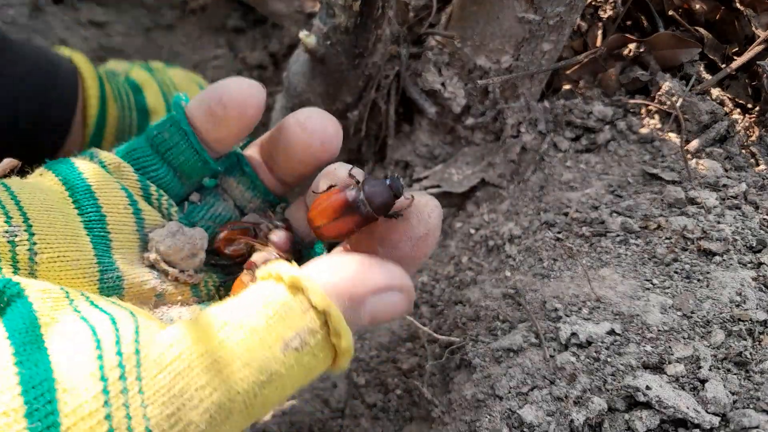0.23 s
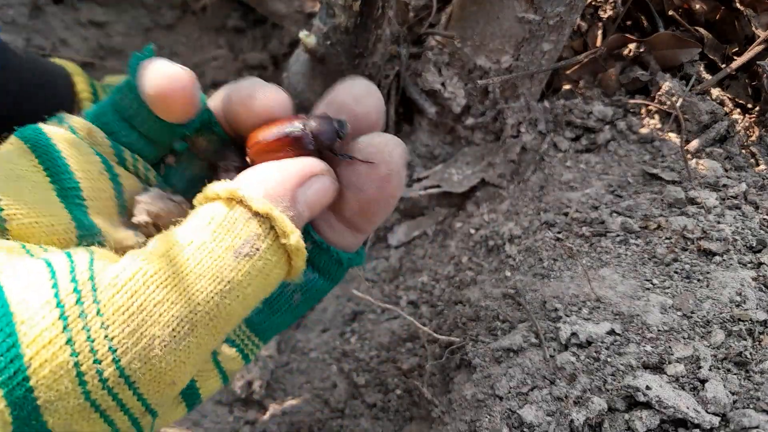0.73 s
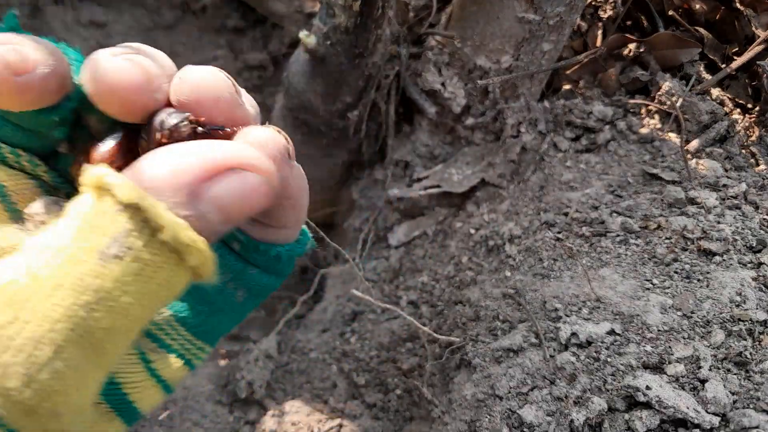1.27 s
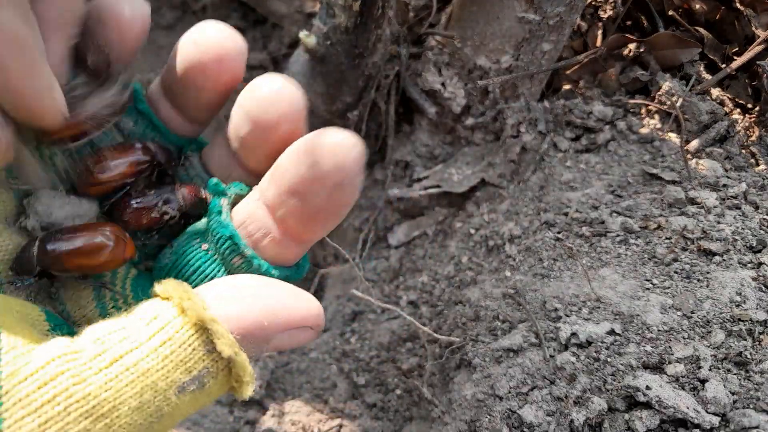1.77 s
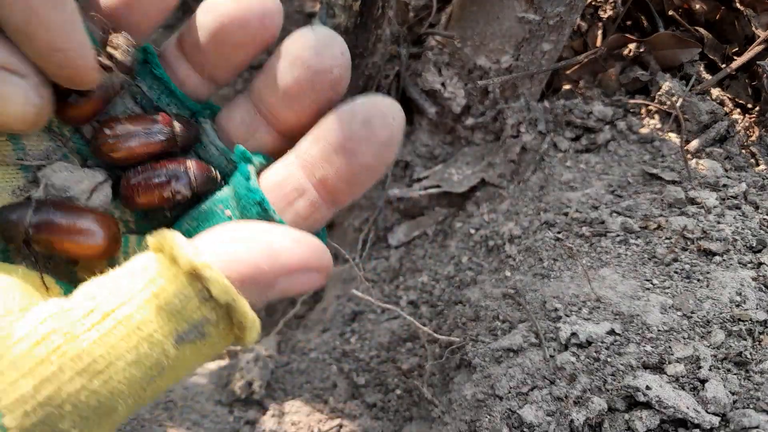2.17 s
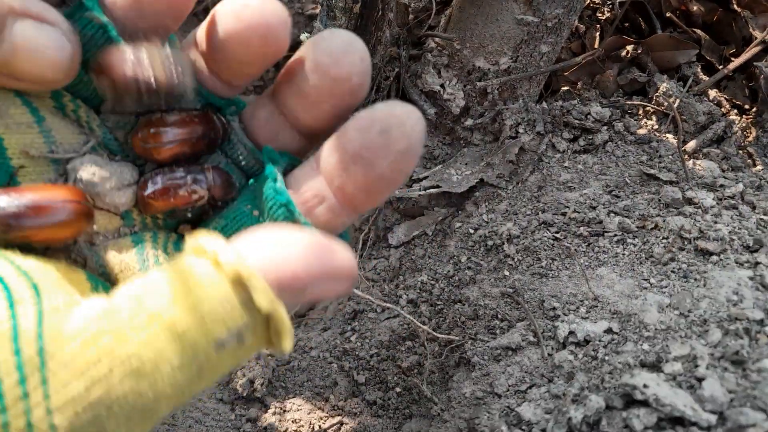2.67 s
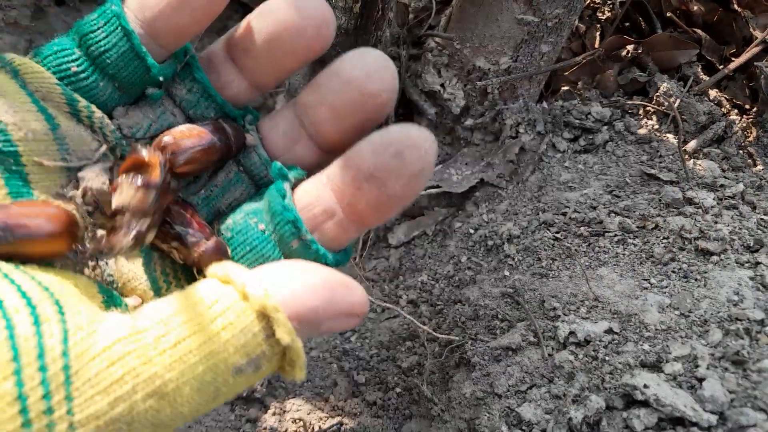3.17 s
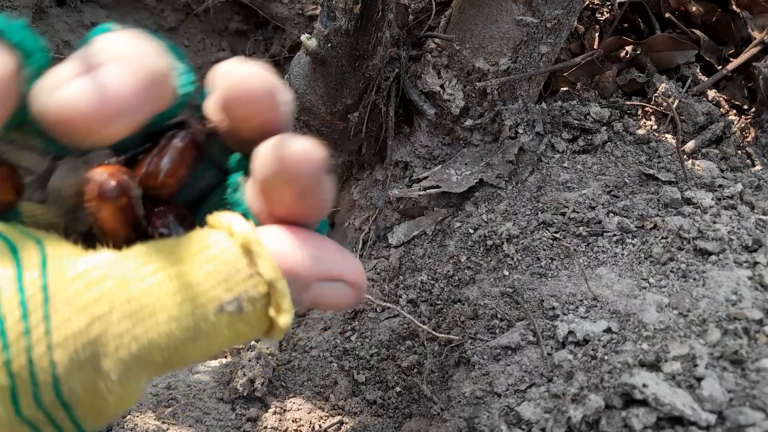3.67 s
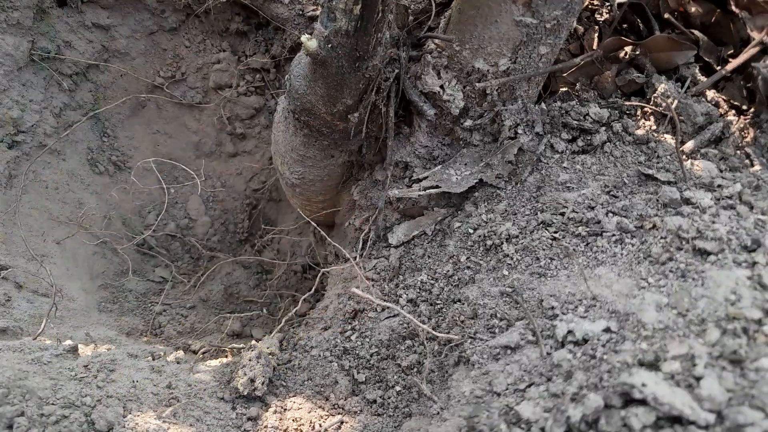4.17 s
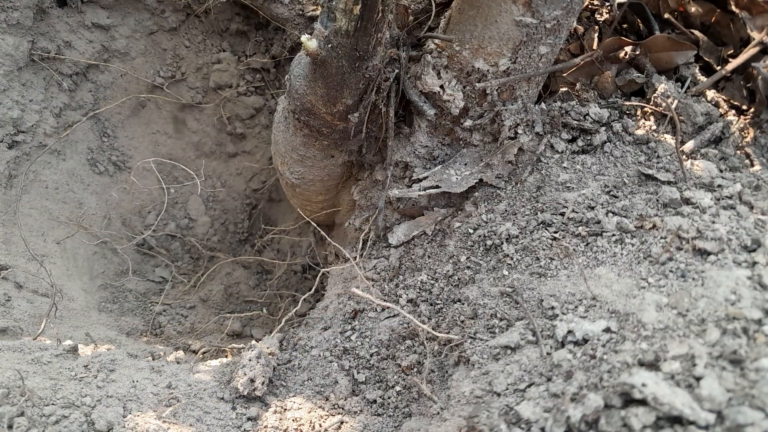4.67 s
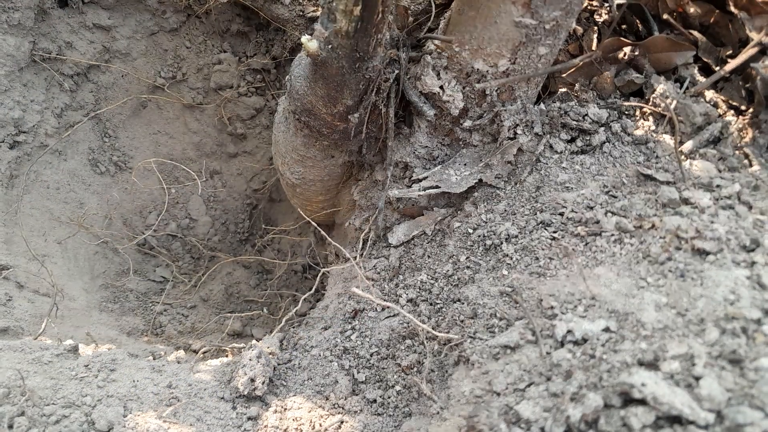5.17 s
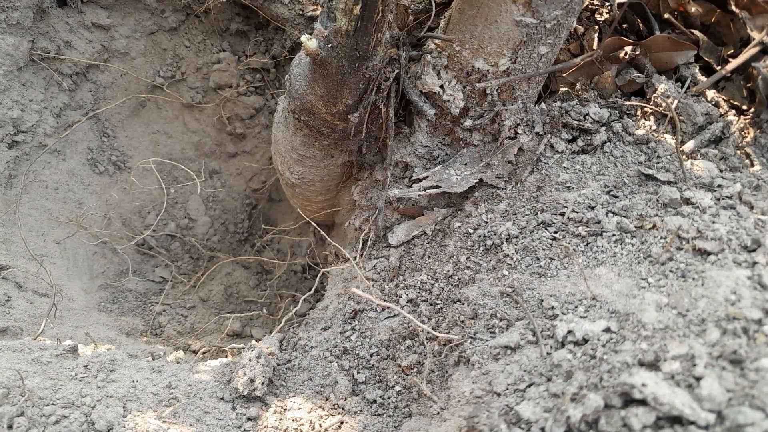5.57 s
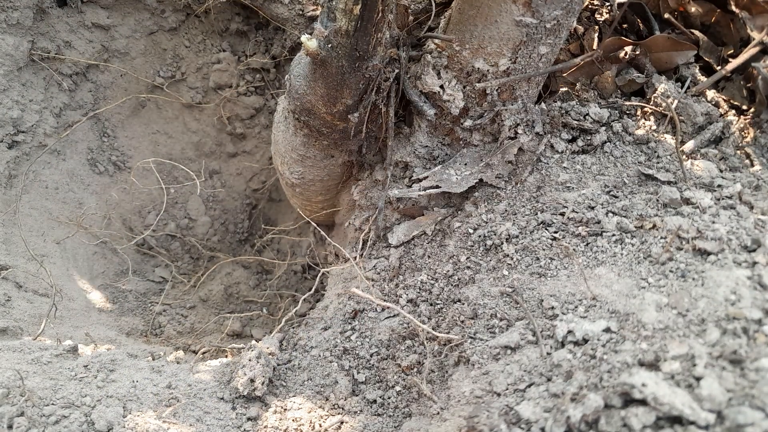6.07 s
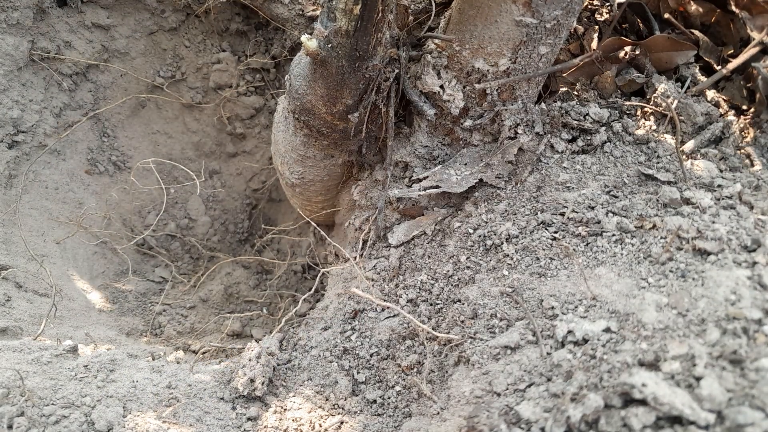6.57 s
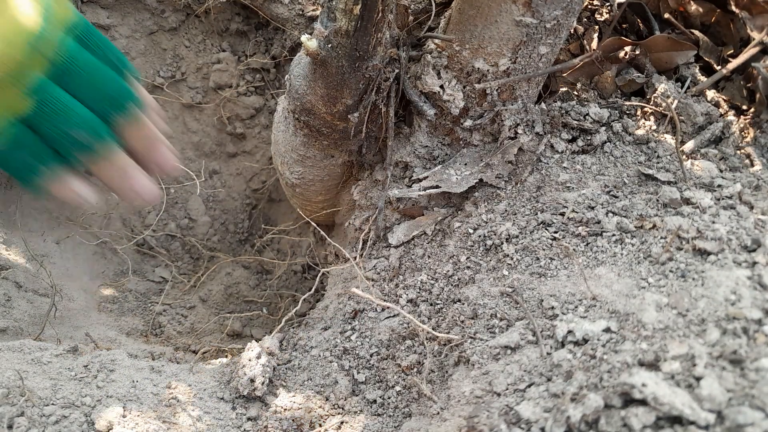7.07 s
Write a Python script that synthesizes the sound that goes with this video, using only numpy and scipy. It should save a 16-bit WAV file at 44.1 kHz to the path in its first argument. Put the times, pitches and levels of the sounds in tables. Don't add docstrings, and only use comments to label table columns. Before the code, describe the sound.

Light wind and faint hiss with tiny dry ticks, then close bursts of crumbly soil cracking, scraping and crunching under gloved hands and a blade.

```python
import sys
import numpy as np
from scipy import signal
from scipy.fft import rfft, irfft, next_fast_len
from scipy.io import wavfile
from scipy.ndimage import uniform_filter1d

SR = 44100
rng = np.random.default_rng(int(sys.argv[2]) if len(sys.argv) > 2 else 0)


def master_out(mix):
    frames = np.transpose(np.atleast_2d(mix))
    ceiling = np.clip(frames, -1, 1)
    pcm = np.round(ceiling * 32767).astype(np.int16)
    wavfile.write(sys.argv[1], SR, pcm)


def makeup_ratio(level_db):
    decades = np.asarray(level_db, float) / 20
    return 10 ** decades


N = 322371

# start_s, left_lead_samples, left_over_right_db
PLACES = [
    (0, 0, -2),
    (.75, 13, 2),
    (1.18, 21, 4.5),
    (1.78, 0, 0),
    (2.78, 21, 6.5),
    (4.1, 17, 9),
    (4.6, 18, 1),
    (5.78, -4, -2.5),
    (6.58, 14, 1),
    (7.06, 18, 7),
]
NEAR_DB = 2.5

# top_s, rise_s, fall_s, strength_db, heaviness_db
GLOVE_RUBS = [(.85, .1, .3, -73, -2), (1.13, .4, .1, -73, -7), (1.35, .25, .15, -61.5, -9),
              (1.58, .08, .15, -76, -14), (2.34, .02, .04, -75, -16), (2.48, .08, .1, -76, -10),
              (1.45, .05, .06, -67, -5), (1.68, .15, .45, -71, -5), (1.7, .05, .1, -84, 14),
              (2.21, .06, .15, -70, -8), (6.68, .25, .08, -65, -6), (6.78, .055, .15, -60, -10),
              (6.92, .15, .15, -59, -11), (7.035, .15, .04, -56, -3), (7.15, .15, .25, -55, -10),
              (7.3, .1, .2, -71, 8)]
# top_s, rise_s, fall_s, strength_db, heaviness_db
LEFT_BLADE_RUBS = [(3.73, .15, .08, -75, -4), (3.81, .04, .07, -65, -2), (3.92, .15, .2, -62, -4),
                   (3.99, .12, .1, -58, -14), (4.05, .1, .1, -64, -9), (4.086, .05, .3, -53, -7),
                   (4.21, .2, .2, -60, -3), (4.32, .05, .075, -42, -9), (4.5, .12, .15, -61, 2),
                   (4.66, .35, .55, -69, -14), (4.87, .015, .15, -56, 0), (5.05, .2, .6, -76, -12),
                   (5.662, .012, .07, -61, 6)]
# top_s, rise_s, fall_s, strength_db, heaviness_db
BLADE_RUBS = [
    (5.825, .07, .15, -62, -7),
    (5.94, .2, .07, -61, -1),
    (6.04, .1, .15, -58, -1),
    (6.16, .14, .15, -50, 1),
    (6.21, .08, .18, -47, 0),
    (6.3, .05, .13, -44, -5),
    (6.37, .08, .15, -50, 0),
    (6.52, .25, .04, -55, -5),
]
# start_s, rise_s, fall_s, strength_db, heaviness_db
SLIDE = (3.31, .09, .09, -52, -11)
SLIDE_HOLD_S = .23
SWELL_DB = 20
GLOVE_DUST_DB, GLOVE_THUD_DB = 1, -5
LEFT_BLADE_DUST_DB, LEFT_BLADE_THUD_DB = -2, -5
BLADE_DUST_DB, BLADE_THUD_DB = -6, -6
SLIDE_DUST_DB, SLIDE_THUD_DB = -.5, 5
DUST_PER_HEAVINESS = -.3
# dust_db, fizz_db, body_db, thud_db
TRICKLE_DB = (-82, -90, -95, -88)

# start_s, strength_db, heaviness_db, depth_db, t60_s
KNOCKS = [(3.2866, -21, -12, -5, .025), (3.3395, -37, -14, 11, .044), (3.61, -37, -29, 16, .01),
          (3.785, -37, -6, -4, .02), (3.9344, -34, -3.5, -18, .012), (4.0772, -39, -9, -3, .013),
          (4.0882, -26, -16, -25, .015), (4.1024, -48, 6, -12, .015), (4.114, -42, -13, -5, .02),
          (4.2241, -40, -10, 5, .061), (4.2866, -29, -6, -16, .051), (4.314, -34, -5.5, 5, .088),
          (4.3258, -27.5, -7.5, -2.5, .046), (4.4641, -45.5, 0, 3, .03), (4.4724, -56, 17, -3, .013),
          (5.646, -26, 0, 6.5, .03), (5.6823, -25, 0, -5.5, .016), (6.7634, -42, -18, -18, .059),
          (7.2798, -39.5, -11, -9, .03), (7.2851, -46, -10, 3, .015)]
# start_s, strength_db, heaviness_db, depth_db, t60_s
CHOPS = [
    (6.0147, -53, 9, -1, .042),
    (6.1155, -45, 0, -19, .088),
    (6.1342, -39, -6, -4, .088),
    (6.2078, -25.5, 11, -13, .03),
    (6.281, -34, 8.5, -21, .03),
    (6.2862, -26.5, -5, 2, .043),
    (6.3006, -34, 10, -29, .025),
    (6.307, -29, 4, -3, .04),
    (6.3671, -28.5, 6, -30, .009),
    (6.3945, -43, -3, -13, .026),
]
# start_s, strength_db, heaviness_db, left_over_right_db
CRUMB_TICKS = [(1.1028, -54, -16, 0), (0.733, -50, -30, 2), (1.1548, -49, -16, -3), (1.1815, -44, -24, 0),
               (1.2057, -53, -22, -3), (1.239, -48, -27, 4), (1.2951, -51.5, -25, 18),
               (1.317, -48, -13, 14), (1.36, -53, -3, 5), (1.4334, -46, -20, 9), (1.4519, -41, -31, 7),
               (1.46, -44, -18, 5), (1.4775, -34, -37, 9), (1.4827, -34, -30, 7), (1.4907, -43, -26, 7),
               (1.6824, -48, -8, 7.5), (1.9244, -61, -2, 17), (1.94, -54, -6, -5), (2.182, -52.5, -27, -5),
               (2.2274, -42, -13, 0), (2.2795, -53.5, -20, 14), (2.74, -60, -8, -7), (2.8405, -55, -10, 13),
               (3.2684, -34, -28, 8), (5.0898, -46, -14, 7), (5.4152, -58.5, -3, 14), (6.4757, -51, 1, 4),
               (6.8, -49, -7, 1), (7.2195, -28, -26, 6), (7.257, -41, -30, -2)]
TICK_T60_S, TICK_THUD_DB = .015, -5
# top_s, strength_db, heaviness_db, half_length_ms
CRUNCHES = [(0.875, -71, 4, 12), (1.356, -45.5, -35, 4.1), (1.8, -59.5, -17, 11), (2.03, -68.5, -21, 13),
            (2.509, -64.5, -10, 30), (2.885, -64, -4.5, 16), (3.246, -44.5, -18, 4.3),
            (3.276, -50.5, -18, 22), (3.285, -30.5, -11, 4.8), (3.551, -40.5, -15, 7.9),
            (3.598, -29, -12, 2.75), (3.792, -33, -9, 2.5), (3.883, -45.5, -3, 4), (4.164, -48.5, -8, 12.4),
            (4.179, -50, -1.5, 9.5), (4.295, -27.5, -9.5, 2.5), (4.511, -48.5, -8, 2.5),
            (4.905, -45.5, -9, 26), (5.73, -60, 2, 25), (6.322, -51, -4, 35), (6.378, -55, 10, 10.2),
            (6.382, -44, -3, 2.8), (6.792, -44, -10, 2.4), (6.814, -50.5, -8.5, 15), (7.18, -28, -24, 4.5),
            (7.212, -41, -11, 3.8),
            (.083, -65, -30, 1), (.315, -61, -25, 1), (.8215, -57, -14, 1), (1.041, -53, -16, 1),
         (1.083, -63, -2, 2), (1.112, -57, -18, 1), (1.168, -55, -20, 1.2), (1.248, -55, -12, 9),
         (1.3535, -42, -22, .9), (1.361, -43, -25, .8), (1.784, -54, -22, 1.2), (2.345, -51, -30, 1),
         (2.8, -55, -22, 1.2), (3.177, -57, -22, 1.2), (3.4185, -41, -14, 1.2), (3.832, -49, -16, 1.5),
         (3.921, -46, -8, 4), (4.001, -46, -16, 2), (4.038, -45, -16, 1.5), (4.05, -48, -16, .8),
         (4.06, -45, -12, 2.5), (4.083, -40, -14, 4), (4.0895, -24, -18, .5), (4.151, -44, -8, 2),
         (4.27, -46, -12, 1.5), (4.2875, -26, -12, .6), (4.328, -23, -16, .5), (4.447, -54, 3, 1.5),
         (4.493, -54, 4, 1.5), (4.524, -49, -2, 2.5), (4.545, -54, 0, 2), (5.656, -48, 10, 2),
         (5.7, -54, 6, 2), (6, -59, 4, 3), (6.043, -51, 0, 3), (6.204, -40, 6, 3), (6.2095, -26, -5, 1.5),
         (6.301, -27, 6, .5), (6.322, -36, -10, 1.5), (6.344, -44, 0, 1.5), (6.352, -42, 0, 1),
         (6.455, -47, 0, 1.5), (6.499, -47, -6, 1.5), (7.126, -39, -22, 1), (2.33, -56, -30, .8),
         (2.695, -59, -25, 1.5), (4.78, -60, -6, 1.5), (6.741, -55, -12, 1.5), (6.828, -50, -15, 1.5),
         (7.073, -48, -20, 1.5)]
CRUNCH_THUD_DB = 0
# top_s, half_length_ms, pitch_hz, level_db
SLIPS = [(6.765, 4.6, 12800, -52), (6.805, 5, 13000, -50), (6.948, 7.2, 12300, -49), (6.962, 6, 14100, -50),
         (6.991, 5, 13000, -45), (7.005, 6, 11500, -49.5), (7.02, 7, 11600, -49),
         (7.036, 7.5, 12100, -48.5), (7.092, 11, 7700, -56), (7.126, 4, 12300, -45.5),
         (7.144, 17, 7600, -52.5), (3.995, 18, 3600, -60), (7.186, 7.7, 3020, -45), (1.16, 23, 660, -72),
         (1.36, 15, 950, -70), (3.35, 22, 720, -60), (3.43, 20, 3800, -58), (3.52, 20, 5500, -55),
         (3.545, 22, 3650, -53), (3.5, 24, 380, -60), (3.8, 10, 720, -58), (4.175, 12, 3500, -54),
         (4.52, 22, 175, -60), (5.8, 20, 300, -68), (6.88, 24, 1700, -70)]

# frequency_hz, density_db
FIZZ = [(2200, -66), (3200, -6.5), (4200, -6), (6000, -6.5), (8000, -4), (12000, -4.5), (15000, -7.5),
        (16500, -30)]
# frequency_hz, density_db
DUST = [(6500, -20), (8500, 1.5), (11500, 1), (14500, -2), (16500, -4)]
# frequency_hz, density_db
SAND = [(2200, -14), (3400, -6.5), (4300, -2.5), (7500, -4.5), (9500, -23)]
# frequency_hz, density_db
CLOD_BODY = [(450, -26), (800, -2.5), (1400, -2.5), (2200, -2), (3200, -6), (4300, -27)]
# pitch_hz, width_hz, level_db
BLADE = [(1080, 200, -11), (1830, 230, 1.5), (2240, 230, -4), (3080, 300, -1), (4100, 450, -6),
         (5000, 450, -9)]
# pitch_hz, width_hz, level_db
PIT = [(240, 80, -.5), (400, 120, 0.5), (690, 240, -5.5)]

# top_s, level_db, half_length_s
GUSTS = [(.13, -65, .1), (.54, -64, .1), (.95, -66, .3), (1.45, -67, .2), (1.9, -63, .22), (2.45, -69, .15),
         (2.86, -66, .1), (3.29, -57, .07), (3.52, -62, .08), (3.75, -60, .1), (4.05, -66, .15),
         (4.33, -60, .08), (4.63, -59, .1), (4.9, -66, .15), (5.35, -64, .1), (5.7, -61, .1), (6, -63, .1),
         (6.3, -56, .1), (6.47, -61, .1), (6.8, -61, .07), (7.16, -59, .08)]
CALM_DB = -71.5
# frequency_hz, density_db
RUMBLE = [(13, -53), (22, -35), (40, -12), (64, 4), (123, -4.5), (162, -9.5), (195, -15.5), (361, -40.5),
          (500, -36.5), (650, -62), (1100, -120)]
# frequency_hz, density_db
HISS = [(88, -30.5), (150, 3), (696, -13), (1360, -18.5), (1970, -16), (3350, -24.5), (4000, -19.5),
        (11400, -17), (15300, -19.5), (16500, -30.5)]
HISS_DB = -78
EDGE_HZ, SHELF_HZ = 15950, 16750


def scrape():
    t = np.arange(N) / SR
    dusty, fizzy, full, deep = effort(t)
    steady = np.interp(t, [3.28, 3.31, 3.56, 3.6], [0, .8, .8, 0])

    large = grit(per_s=100, spread_db=1.0, smooth=3.1, fade=.995) * makeup_ratio(2.1 * lumps(0.038))
    large = steady * large.mean() + (1 - steady) * large
    dust, sand, clods = rng.standard_normal((3, 2, N)) * large
    fine = [grit(per_s=500, spread_db=2.7, smooth=.9, fade=.95),
            grit(per_s=350, spread_db=2.6, smooth=1.5, fade=.96)]
    dust_grains, sand_grains = [steady * g.mean() + (1 - steady) * g for g in fine]

    dust = coloured(dust * dust_grains, DUST)
    sand = coloured(sand * sand_grains, SAND)
    metal = np.where(lead_of(t) < -1, .92, .1)
    ring = evened(ringing(clods, BLADE))
    dull = coloured(clods * sand_grains ** .5, CLOD_BODY)
    body = metal * ring + np.sqrt(1 - metal ** 2) * dull
    thud = evened(ringing(clods, PIT))
    layers = dusty * dust + fizzy * sand, full * body, deep * thud
    return .95 * ports(layers, lead_of(t), uniform_filter1d(side_of(t), size=4000))


def effort(t):
    coarse = t[::64]
    power = rubbing(coarse, GLOVE_RUBS, GLOVE_DUST_DB, GLOVE_THUD_DB)
    power = power + rubbing(coarse, LEFT_BLADE_RUBS, LEFT_BLADE_DUST_DB, LEFT_BLADE_THUD_DB)
    power = power + rubbing(coarse, BLADE_RUBS, BLADE_DUST_DB, BLADE_THUD_DB)
    power = power + rubbing(coarse, [SLIDE], SLIDE_DUST_DB, SLIDE_THUD_DB, SLIDE_HOLD_S)
    power = power + makeup_ratio(2 * np.array(TRICKLE_DB))[:, None]
    return [np.interp(t, coarse, np.sqrt(p)) for p in power]


def rubbing(t, rows, dust_db, thud_db, hold_s=0):
    power = 0
    for top, rise, fall, db, heavy_db in rows:
        away = np.maximum((top - t) / rise, (t - top - hold_s) / fall)
        swell = makeup_ratio(2 * (db - SWELL_DB * np.maximum(away, 0)))
        shares_db = np.array([dust_db + DUST_PER_HEAVINESS * heavy_db, 0, heavy_db, heavy_db + thud_db])
        power = power + makeup_ratio(2 * shares_db)[:, None] * swell
    return power


def grit(per_s, spread_db, smooth, fade):
    size = makeup_ratio(spread_db * np.minimum(rng.exponential(1, N), 4))
    hits = size * (rng.random(N) < per_s / SR)
    return smooth + evened(signal.lfilter([1], [1, -fade], hits))


def cracks():
    before = 1400
    out, t = np.zeros((2, N + 4000)), np.arange(-before, 2600) / SR
    after = np.maximum(t, 0)
    events = []  # (start or top s, strength dB, heaviness dB, thud against body dB, left-right dB, shape)
    sharp = [(s, db, heavy_db, TICK_THUD_DB, TICK_T60_S, pan_db) for s, db, heavy_db, pan_db in CRUMB_TICKS]
    sharp += [(*row, near_side(row[0])) for row in KNOCKS + CHOPS]
    for s, db, heavy_db, depth_db, t60, pan_db in sharp:
        decay = makeup_ratio(-60 * after / np.clip(t60, .006, .09))
        shape = (1 - np.exp(-after / 0.00017)) * decay
        events.append((s, db, heavy_db, depth_db, pan_db, shape))
    for s, db, heavy_db, half_ms in CRUNCHES:
        bell = makeup_ratio(-np.minimum(8 * abs(1000 * t / half_ms) ** 0.96, 200))
        events.append((s, db, heavy_db, CRUNCH_THUD_DB, near_side(s), bell))
    for s, db, heavy_db, depth_db, pan_db, shape in events:
        at = round(s * SR) - before
        body_db = db + heavy_db
        out[:, at:at + len(t)] += burst(s, shape, db, body_db, body_db + depth_db, pan_db)
    return out[:, :N]


def burst(s, shape, fizz_db, body_db, thud_db, pan_db):
    noise, rag = rng.standard_normal((2, 2, len(shape)))
    noise = noise * makeup_ratio(3.27 * evened(uniform_filter1d(rag[0], 20)))
    tilt_db = -.35 * np.clip(body_db - fizz_db + 12.5, -9, 14)
    own = [(hz, db + 2.9 * z + tilt_db * np.log2(hz / 5000)) for (hz, db), z in zip(FIZZ, rag[1])]
    fizz = coloured(noise, own) * shape ** 1.13

    ring = ringing(noise * shape, BLADE)
    ring = ring / np.linalg.norm(ring, axis=1, keepdims=True) * np.linalg.norm(shape)
    dull = coloured(noise, CLOD_BODY) * shape ** 0.81
    metal = .96 if lead_of(s) < 0 else .3
    body = metal * ring + np.sqrt(1 - metal ** 2) * dull

    thud = ringing(noise * shape ** .65, PIT)
    thud = thud / abs(thud).max(axis=1, keepdims=True)
    layers = makeup_ratio(fizz_db - 4) * fizz, makeup_ratio(body_db - 4) * body, makeup_ratio(thud_db - 6.0) * thud
    return ports(layers, lead_of(s), pan_db)


def slips():
    before = 1400
    out, t = np.zeros((2, N)), np.arange(-before, before) / SR
    for s, half_ms, hz, db in SLIPS:
        noise, rag = rng.standard_normal((2, 2, len(t)))
        narrow = ringing(noise, [(hz, 0.11 * hz, 0)])
        puff = evened(ringing(narrow, [(hz, .2 * hz, 0)]))
        rag_db = 2.5 * evened(uniform_filter1d(rag[0], 40))
        puff *= makeup_ratio(db - 9 * (1000 * t / half_ms) ** 2 + rag_db)
        at = round(s * SR) - before
        out[:, at:at + len(t)] += ports([puff], lead_of(s), 3.4)
    return out


def wind():
    t = np.arange(N) / SR
    coarse = t[::64]
    power = makeup_ratio(2 * CALM_DB)
    for s, db, half in GUSTS:
        power = power + makeup_ratio(2 * (db - 6 * ((coarse - s) / half) ** 2))
    z = rng.standard_normal((3, N))
    gusts = coloured(z[:2] + 1.25 * z[2], RUMBLE) * makeup_ratio(2.0 * lumps(0.073))
    return evened(gusts) * np.interp(t, coarse, np.sqrt(power))


def air():
    z = rng.standard_normal((3, N))
    flutter_db = .7 * lumps(.03)
    return makeup_ratio(HISS_DB + 2.5 + flutter_db) * coloured(z[:2] + 0.25 * z[2], HISS)


def ports(layers, lead, pan_db):
    out = 0
    alike = [.48, .76, .95]
    shading = [1.0, np.where(lead < 0, 1.3, .3), .3]
    for x, same, shade in zip(layers, alike, shading):
        last = x.shape[1] - 1
        late = x[0][np.clip(np.arange(last + 1) - lead, 0, last)]
        right = same * late + np.sqrt(1 - same ** 2) * x[1]
        out = out + np.array([x[0] * makeup_ratio(shade * pan_db / 2), right * makeup_ratio(-shade * pan_db / 2)])
    return out


def lead_of(s):
    start, lead, _ = np.transpose(PLACES)
    return np.round(lead[np.searchsorted(start[1:], s)]).astype(int)


def side_of(s):
    start, _, pan_db = np.transpose(PLACES)
    return pan_db[np.searchsorted(start[1:], s)]


def near_side(s):
    return side_of(s) + NEAR_DB * np.sign(lead_of(s))


def ringing(x, modes):
    out = 0
    for k, (hz, width, db) in enumerate(modes):
        out = out + (-1) ** k * makeup_ratio(db) * signal.lfilter(*signal.iirpeak(hz, hz / width, SR), x)
    return out


def coloured(x, points):
    size = next_fast_len(x.shape[-1])
    f, db = np.transpose(points)
    gain = makeup_ratio(np.interp(np.log(np.fft.rfftfreq(size, 1 / SR) + 1), np.log(f), db, left=-90))
    return evened(irfft(rfft(x, size) * gain, size)[..., :x.shape[-1]])


def lumps(seconds, channels=1):
    size = max(round(seconds * SR), 2)
    z = rng.standard_normal((channels, N))
    return evened(uniform_filter1d(uniform_filter1d(z, size), size))


def evened(x):
    return x / np.sqrt(np.mean(x ** 2) + 1e-20)


def scene():
    return scrape() + cracks() + slips() + wind() + air()


def top_cut(x):
    return signal.sosfilt(signal.butter(12, 16970, fs=SR, output="sos"), x)


def record(dry):
    edge, shelf = (signal.firwin(601, hz, window=("kaiser", 7), fs=SR) for hz in (EDGE_HZ, SHELF_HZ))
    taps = edge + makeup_ratio(-32) * (shelf - edge)
    mix = signal.oaconvolve(dry, taps[None], "same")
    return top_cut(mix)


dry = scene()
out = record(dry)
master_out(out)
```